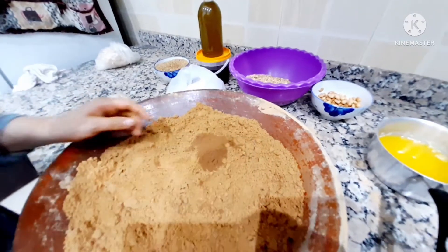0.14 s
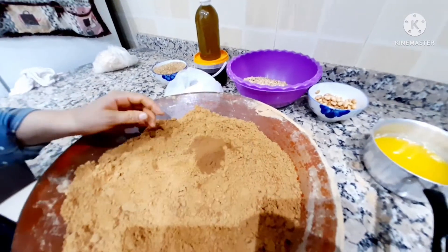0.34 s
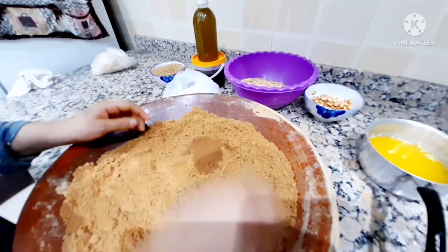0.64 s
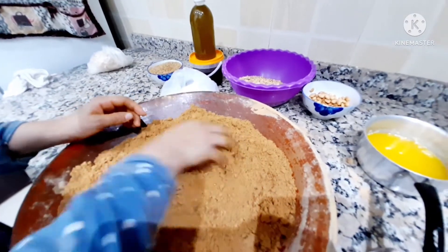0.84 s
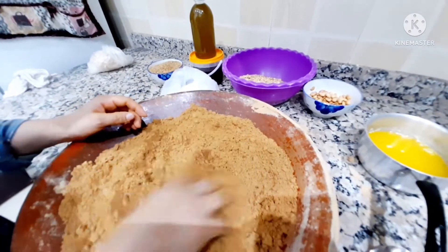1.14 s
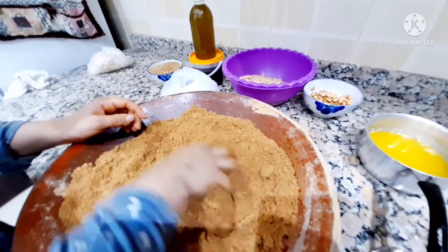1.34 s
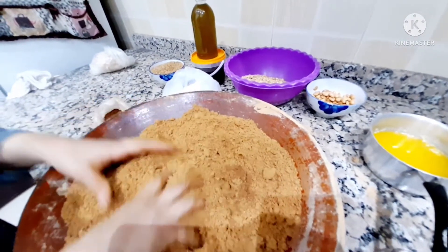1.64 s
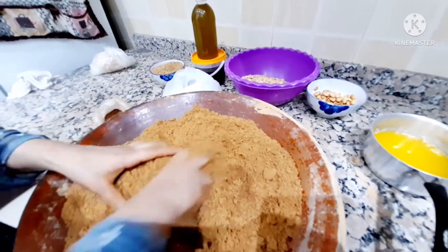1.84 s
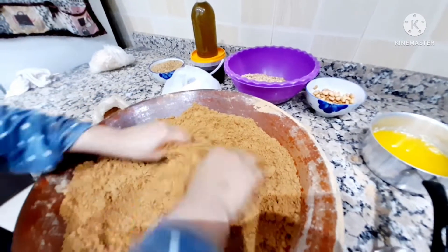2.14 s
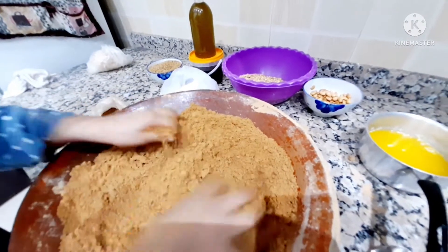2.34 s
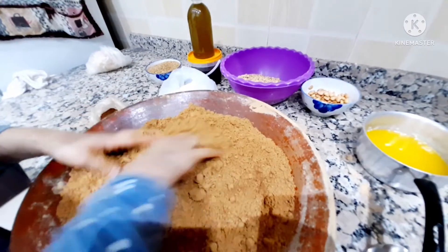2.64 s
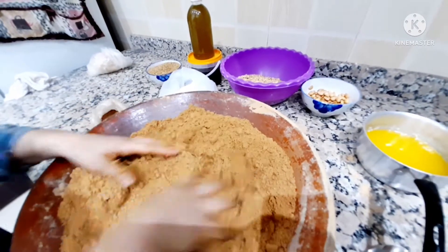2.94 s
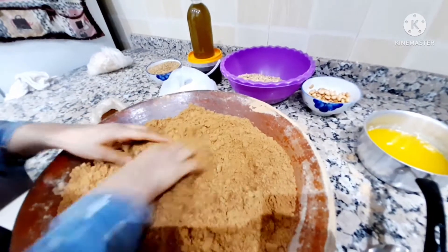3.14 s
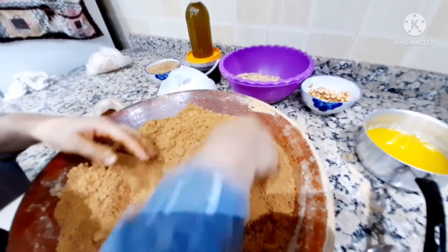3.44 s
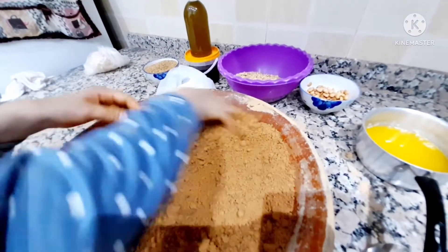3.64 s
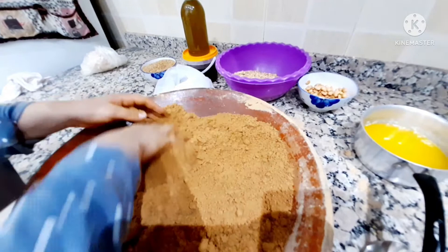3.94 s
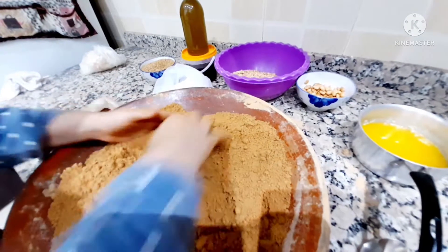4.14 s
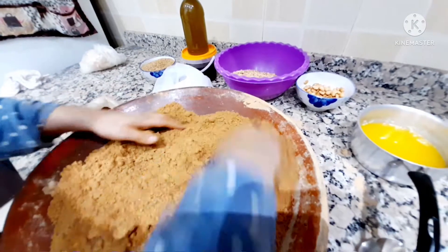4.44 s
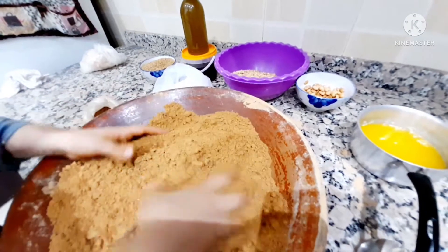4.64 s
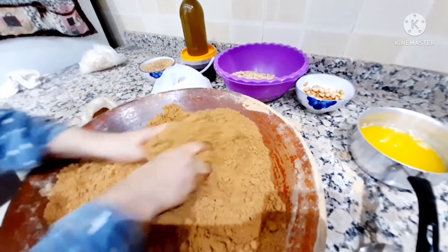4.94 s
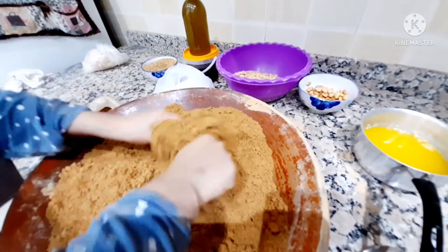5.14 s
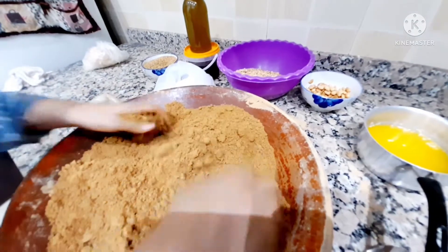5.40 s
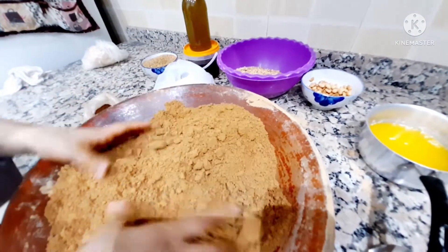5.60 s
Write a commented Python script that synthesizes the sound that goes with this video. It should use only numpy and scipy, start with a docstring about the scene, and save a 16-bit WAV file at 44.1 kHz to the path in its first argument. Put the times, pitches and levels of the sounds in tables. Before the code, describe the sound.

Close stereo sound in a small tiled kitchen with a steady low fridge hum. After a faint powdery hiss, a spoon knocks and clatters sharply within the first second, ringing briefly. Then soft, dry strokes of hands through powder come and go, becoming fuller and more frequent towards the end.

```python
"""Two hands turn over dry powder in a wide clay dish: shaped noise hisses and rustles, random ticks
are crumbs and grit. Early on a steel spoon is put down and rattles to rest, a bank of decaying modes
with noise clacks. A fridge hums in harmonics in the small tiled kitchen, over faint room noise.
The clatter overloads the recorder, whose gain control holds everything lower for more than a second."""
import sys
import numpy as np
from scipy import signal
from scipy.fft import rfft, irfft
from scipy.io import wavfile
from scipy.ndimage import uniform_filter1d

SR = 44100
rng = np.random.default_rng(int(sys.argv[2]) if len(sys.argv) > 2 else 0)


def pcm_store(signal):
    """Save signal as 16-bit PCM."""
    levels = np.round(np.clip(np.atleast_2d(signal), -1, 1) * 32767)
    wavfile.write(sys.argv[1], SR, levels.astype(np.int16).T)


N = 254313
TIME = np.arange(N) / SR

# Likeness of the two sides of a diffuse field: (frequency [Hz], left-right coherence [-1 to 1])
COHERENCE = [(60, 0.89), (130, 0.93), (290, 0.82), (640, 0.37), (1410, -0.13), (3100, -0.1), (15000, 0)]


def amp(db):
    """Decibels to amplitude gain."""
    return 10 ** (np.asarray(db) / 20)


def unit(x):
    """Normalisation to an rms of 1."""
    return x / np.sqrt(np.mean(x ** 2) + 1e-20)


def at_hz(points, hz):
    """Interpolation of a spectrum along a log-frequency axis."""
    f, value = np.transpose(points)
    return np.interp(np.log(hz + 1), np.log(f + 1), value)


def at_time(rows, t):
    """Linear interpolation of every column of a curve at the times t."""
    s, *columns = np.transpose(rows)
    return [np.interp(t, s, column) for column in columns]


def panned(db):
    """Constant-power panning: gains for a left minus right level difference [dB]."""
    gains = amp(np.array([np.atleast_1d(db), -np.atleast_1d(db)]) / 2)
    return gains / np.sqrt(np.mean(gains ** 2, axis=0))


def add(mix, s, sound):
    """Superposition: a stereo sound joins the mix at time s [s]."""
    part = mix[:, max(round(s * SR), 0):][:, :sound.shape[1]]
    part += sound[:, :part.shape[1]]


def coloured(x, points):
    """Linear filtering by a magnitude spectrum, to an rms of 1."""
    size = x.shape[-1]
    gain = amp(at_hz(points, np.fft.rfftfreq(size, 1 / SR)))
    return unit(irfft(rfft(x) * gain, size))


def drift(rate_hz):
    """Low-frequency random modulation of rms 1, from two interpolated knots per cycle of the rate."""
    knots = rng.standard_normal(1024)
    return unit(np.interp(TIME * rate_hz * 2, np.arange(1024), knots))


def diffuse(field_db, patchy_db, size):
    """Diffuse-field noise shaped over time and frequency, its sides as coherent as COHERENCE says."""
    hop = size // 4
    t = np.arange(N // hop + 5)[:, None] * hop / SR
    hz = np.fft.rfftfreq(size, 1 / SR)
    a, b, c, d, patches = rng.standard_normal((5, len(t), len(hz)))
    patches = uniform_filter1d(patches, size=10, axis=0)
    patches = unit(uniform_filter1d(patches, size=9, axis=1))
    same = np.clip(at_hz(COHERENCE, hz), -1, 1)
    left = a + 1j * b
    right = same * left + np.sqrt(1 - same ** 2) * (c + 1j * d)
    frames = np.array([left, right]) * amp(field_db(t, hz) + patchy_db * patches)
    noise = signal.istft(frames.transpose(0, 2, 1), nperseg=size, noverlap=size - hop)[1]
    return unit(noise[:, :N])


def kitchen(x, delay=0.0034):
    """Reverberation: tiles and worktop reflect densely, mostly dying sooner in the treble."""
    # Decay time of the room: (frequency [Hz], time to fall by 60 dB [s])
    decay_times = [(300, 0.48), (2000, 0.36), (5000, 0.15), (9000, 0.23), (15000, 0.096)]
    hz, t, z = signal.stft(rng.standard_normal((2, SR // 2)), SR, nperseg=256)
    decay = amp(-60 * t / at_hz(decay_times, hz)[:, None])
    tail = signal.istft(z * decay, SR, nperseg=256)[1]
    # silent for the delay [s], then rising to full over the same time
    tail *= np.clip(np.arange(tail.shape[1]) / SR / delay - 1, 0, 1)
    return signal.fftconvolve(x, tail / np.linalg.norm(tail[0]), axes=1)[:, :N]


def room_air(level_db=-48, side_db=-1):
    """Stationary broadband noise: a low rush with a faint hiss on top."""
    # Colour of the room noise: (frequency [Hz], relative level [dB])
    air_colour = [(20, -23.5), (35, -10.5), (60, 1), (100, 10), (170, -2), (300, -1), (480, -6.5),
                  (750, -9.5), (1000, -15.5), (1300, -12), (1500, -22), (2500, -20.5), (4000, -27.5),
                  (7000, -31.5), (9000, -36.5), (15500, -32)]
    noise = diffuse(lambda t, hz: at_hz(air_colour, hz), patchy_db=-0.45, size=2048)
    return amp(level_db) * panned(side_db) * noise


def fridge(level_db=-37.5, waver_db=0.26, wobble=0.022, cabinet_db=0):
    """Periodic forcing yields harmonics of the compressor shaft; cabinet panels buzz as narrowband noise."""
    # Compressor harmonics: (multiple of the shaft speed, relative level [dB])
    hum_orders = [(1, -23), (2, 1), (3, -37.5), (4, -25.5), (5, -23), (6, -18), (7, -4.5), (8, -30.5),
                  (9, -20), (10, -23), (11, -26), (12, -36.5), (13, -27), (14, -30.5), (15, -33), (16, -22),
                  (17, -35.5), (18, -57), (19, -52), (20, -60.5), (21, -32), (22, -30.5), (23, -46),
                  (24, -54), (25, -38.5), (26, -28.5), (27, -40), (28, -44.5), (29, -65.5), (30, -50),
                  (31, -64), (32, -43.5), (33, -38.5), (34, -42), (35, -37), (36, -54), (37, -37)]
    # Unsteady cabinet tones: (centre frequency [Hz], approximate width [Hz], level [dB])
    cabinet_tones = [(135.8, 2, -54), (145.4, 2.4, -66), (237.2, 6, -60), (242, 5, -60.5),
                     (298.7, 8, -57.5), (329, 8.8, -60.5), (816, 36, -70.5), (1290, 120, -69)]
    # Stereo balance of the hum: (frequency [Hz], left minus right [dB])
    hum_balance = [(100, -1), (200, 3), (345, -3.5), (480, 6), (590, 7), (650, -3.5), (790, 4),
                   (1300, -7.5), (4000, 9), (15000, 0)]
    shaft_hz = 49.335
    dip_s, dip_width_s, dip_db = 3.28, 0.08, -5.5  # the two lowest harmonics dip once
    out = np.zeros((2, N))
    shaft = 2 * np.pi * shaft_hz * TIME + wobble * drift(1.5)  # phase, wobble in radians
    dip = amp(dip_db * np.exp(-((TIME - dip_s) / dip_width_s) ** 2))
    wavers = [amp(waver_db * drift(6)) for _ in range(3)]
    for k, (_, db) in enumerate(hum_orders, 1):
        hz = k * shaft_hz
        # phase between the two sides
        apart = np.arccos(np.clip(at_hz(COHERENCE, hz), -1, 1)) * np.array([[0], [.7]])
        tone = np.sqrt(2) * np.sin(k * shaft + 2 * np.pi * rng.random() + apart)
        tone = tone * wavers[k % len(wavers)] * (dip if k <= 2 else 1)
        out += amp(level_db + db) * panned(at_hz(hum_balance, hz)) * tone
    for hz, width_hz, db in cabinet_tones:
        turn = 2 * np.pi * hz * TIME
        buzz = drift(width_hz / 2) * np.cos(turn) + drift(width_hz / 2) * np.sin(turn)
        out += amp(db + cabinet_db) * panned(-1) * buzz
    return out


def contact_weight(hz, favoured_hz, octave_db):
    """Modal excitation: where and how hard the spoon touches favours part of its spectrum."""
    octaves_off = abs(np.log2((hz + 1) / favoured_hz))
    return -octave_db * np.minimum(octaves_off, 1.6)


def spoon_contacts(count=3):
    """Successive impacts lose energy: the fall's contacts, then rocks each sooner and weaker."""
    # Contacts of the fall: (time [s], relative ring level [dB], favoured frequency [Hz],
    # relative clack level [dB])
    fall_contacts = [(.408, -51, 9000, -55), (.4932, -17, 5000, -8.5), (.494, -15.5, 15000, -7),
                     (.5073, -30, 4690, -2), (.575, -18.5, 12200, -8.5), (.579, -17.5, 7030, -11),
                     (.612, -18.5, 5170, -15), (.629, -26.5, 2100, -42.5), (.648, -22, 5120, -36),
                     (.677, -23, 6140, -14), (.690, -28, 2900, -37.5), (.711, -26, 5000, -36.5),
                     (.729, -30.5, 7100, -28), (.823, -48, 13600, -34)]
    s, gap_s, shrink = .922, .082, 0.89  # first rock, first gap, ratio of successive gaps
    first_db, loss_db, rock_hz, clack_db = -56, 5.5, 6900, 1  # clack relative to the ring
    rocks = []
    for k in range(count):
        ring_db = first_db - k * loss_db
        rocks.append((s, ring_db, rock_hz, ring_db + clack_db))
        s += gap_s * shrink ** k
    return fall_contacts + rocks


def knock(level_db=-27, fade_s=0.0028, side_db=-2, wet_db=-3):
    """Damped impact: the spoon, still held by the fingers, touches down as a short dull noise."""
    # Colour of the knock: (frequency [Hz], relative level [dB])
    knock_colour = [(200, -20), (400, 12), (650, -3), (940, 7), (1450, -11), (1850, -4.5), (3000, -7.5),
                    (3900, 3.5), (6800, -6), (8100, -18), (14500, -5.5)]
    knock_s = .3275
    t, out = np.arange(4096) / SR, np.zeros((2, N))
    blow = t / fade_s * np.exp(1 - t / fade_s)
    noise = coloured(rng.standard_normal((2, len(t))), knock_colour)
    add(out, knock_s, amp(level_db) * panned(side_db) * blow * noise)
    return out + amp(wet_db) * kitchen(out)


def spoon_ring(octave_db=13, stored_db=-5, store_s=0.0071, waver_db=3.0):
    """Modal synthesis: contacts feed energy to shared decaying modes and upset their phase."""
    # Mode frequencies of the spoon [Hz]
    mode_hz = [660, 2067, 2817, 3279, 3480, 3942, 4517, 4852, 5060, 5768, 6266, 6513, 6865, 7275, 7442,
               8419, 8595, 8823, 9760, 10022, 11040, 11579, 12201, 12662, 12876, 13108, 13849, 14128, 14376,
               15264, 15365]
    # The same modes in order: (relative level [dB], time to fall by 60 dB [s], left minus right [dB])
    modes = [(-7, .35, 0), (-1, .2, -1), (-2, .25, -7), (-16, 1.7, -8), (-19, .5, 5), (-14, .55, -5),
             (-16, .6, -4), (0, .33, -11), (-7, .22, -14), (-20, .75, -8), (0, .3, -11), (-16, .25, -6),
             (-10, .26, 0), (-2, .33, -7), (-15, .28, -12), (-12, .28, -8), (-21, .6, -1), (-7, .28, -8),
             (-9, .3, -6), (-9, .33, -3), (-17, .33, -5), (-13, .28, -9), (-10, .3, -3), (-3, .24, -7),
             (-3, .21, -4), (-12, .27, -5), (-12, .3, -10), (-4, .19, -6), (-14, .23, -14), (-10, .24, -3),
             (-10, .24, -10)]
    s, level_db, favoured_hz, _ = np.transpose(spoon_contacts())
    out = np.zeros((2, N))
    build = np.exp(-1 / (.0007 * SR))  # the swing builds up over 0.7 ms
    keep = np.exp(-1 / (store_s * SR))
    for hz, (db, t60, side_db) in zip(mode_hz, modes):
        t = np.arange(int((s[-1] - s[0] + t60) * SR)) / SR
        blows = np.zeros(len(t))
        blow_db = level_db + db + contact_weight(hz, favoured_hz, octave_db)
        blows[np.round((s - s[0]) * SR).astype(int)] = amp(blow_db)
        power = signal.lfilter([1], [1, -amp(-120 / (t60 * SR))], blows ** 2)
        # a blow strong beside the ringing turns the phase further
        kick = np.arcsin(np.clip(blows / np.sqrt(power + 1e-20), 0, 1))
        kick = kick * rng.choice([-1, 1], len(t))
        # the room stores part of the ring
        power = power + amp(stored_db) ** 2 * signal.lfilter([1 - keep], [1, -keep], power)
        phasor = np.sqrt(power) * np.exp(1j * np.cumsum(kick))
        swing = signal.lfilter([1 - build], [1, -build], phasor)
        # reflections beat against the direct tone, differently on each side
        beats = np.array([np.interp(t * 90, np.arange(300), rng.standard_normal(300)) for _ in range(2)])
        beats *= np.exp(-np.maximum(s[0] + t - s[-1], 0) / t60)
        beats *= min(hz / 5000, 1.5)  # short waves beat more deeply
        side_turn = np.array([[0], [rng.choice([-.2, .2])]])
        turns = hz * t + rng.random() + side_turn + .08 * beats[::-1]  # phase in cycles
        tone = (swing * np.exp(2j * np.pi * turns)).real
        add(out, s[0], panned(side_db) * amp(waver_db * beats) * tone)
    return out + amp(-10) * kitchen(out)


def spoon_clacks(clack_s=0.001, side_db=-8, octave_db=7):
    """Impulsive contact noise: each touch is a brief broadband decay, faintly reverberated."""
    # Colour of the hard clacks: (frequency [Hz], relative level [dB])
    clack_colour = [(200, -28), (650, -6), (1300, -6.5), (2400, -13.5), (3600, -10), (5000, -2),
                    (7000, 1.5), (8100, -21.5), (10500, -27.5), (12500, -12), (15500, -6.5)]
    t, out = np.arange(2048) / SR, np.zeros((2, N))
    for s, _, favoured_hz, db in spoon_contacts():
        colour = [(hz, level + contact_weight(hz, favoured_hz, octave_db)) for hz, level in clack_colour]
        noise = coloured(rng.standard_normal((2, len(t))), colour)
        add(out, s, amp(db) * panned(side_db) * noise * np.exp(-t / clack_s))
    return out + amp(-4) * kitchen(out)


def fingers(side_db=-2, grain=0.088):
    """Friction noise: fingers and sleeve brush past in soft bands that swell and fade unevenly."""
    # Brushes: (time [s], relative level [dB], centre frequency [Hz], length [s], fall-off [dB per octave])
    brushes = [(2.191, -72, 5460, .22, 27.5), (3.005, -64, 5450, 0.089, 41), (3.15, -69, 5400, 0.22, 48),
               (3.381, -65, 5360, 0.06, 40), (3.66, -63, 4980, .06, 23), (3.773, -55.5, 800, 0.13, 26),
               (4.224, -55, 5500, 0.024, 4), (4.262, -51, 1930, 0.13, 27), (4.5, -51, 800, 0.11, 11),
               (4.91, -47.5, 1220, 0.031, 29)]
    out, u = np.zeros((2, N)), np.arange(SR) / SR
    for s, db, hz, length, octave_db in brushes:
        band = [(hz * 2. ** k, -octave_db * abs(k)) for k in range(-4, 5)]
        swell = 2 * u / length * np.exp(1 - 2 * u / length)  # peaks at half the length
        swell = swell * (1 + grain * drift(72.0)[:SR])
        noise = coloured(rng.standard_normal((2, len(u))), band)
        add(out, s, amp(db) * panned(side_db) * swell * noise)
    return out


def hand_motion(size=1200):
    """Incoherent addition: strokes speed up and come to rest, and overlapping ones add their power.
    Rows of (time [s], sliding [dB], share of fine hiss [dB], left minus right [dB], pushing [dB])."""
    # Strokes of a hand: (time at its fastest [s], rise [s], fall [s], relative sliding level [dB],
    # share of fine hiss [dB], left minus right [dB], relative pushing level [dB])
    strokes = [(.08, 0.058, 0.057, -62, -4, -2, -80), (.21, 0.036, .08, -68.5, 2, -5, -79.5),
               (1.51, 0.027, 0.043, -58, -3.5, -4, -75), (1.85, 0.067, 0.18, -62, -8.5, -3, -59.5),
               (2.09, 0.057, 0.069, -54.5, -4, -4.5, -70.5), (2.32, 0.16, 0.29, -64, -15, -7.5, -64),
               (3.05, 0.14, 0.27, -64, -8, -3, -63.5), (3.42, .05, 0.069, -60, -7, -1, -65),
               (3.72, 0.053, 0.094, -57.5, -8.5, -7, -60), (3.88, 0.086, .12, -66, -12, -4, -58.5),
               (4.249, .02, 0.17, -53, -19, -2, -59), (4.5, 0.12, 0.15, -49, -7, -6.5, -54.5),
               (4.76, 0.15, 0.2, -60, -8, -5, -55), (4.91, 0.13, 0.13, -59, -8, -2.5, -55.5),
               (5.2, 0.087, 0.15, -66.5, -9, -10, -71), (5.5, 0.048, 0.13, -50, -6, -2, -60),
               (5.75, 0.21, .1, -63.5, -13, -3, -57.5)]
    fall_shape = 1.3  # 1 = the powder comes to rest exponentially, 2 = like a bell curve
    t = np.linspace(0, N / SR, size)
    s, rise, fall, slide_db, fine_db, side_db, push_db = np.transpose(strokes)[:, :, None]
    speed = np.exp(-np.where(t < s, ((t - s) / rise) ** 2, abs((t - s) / fall) ** fall_shape))
    slide = (speed * amp(slide_db)) ** 2 + 1e-20
    push = (speed * amp(push_db)) ** 2 + 1e-20
    share = slide / slide.sum(0)
    total_slide_db, total_push_db = 10 * np.log10(slide.sum(0)), 10 * np.log10(push.sum(0))
    return np.transpose([t, total_slide_db, (share * fine_db).sum(0), (share * side_db).sum(0), total_push_db])


def pushing_palms(motion, level_db=3, side_db=-1, grit_db=-11, grit_per_s=500):
    """Granular shear: the packed heap rustles dully, and grit catches on the clay."""
    # Colour of the rustle: (frequency [Hz], relative level [dB])
    push_colour = [(250, 3), (500, 5.5), (800, 7), (1250, 7), (1520, 6), (1950, 7), (2600, -4.5),
                   (4000, -8), (7000, -14)]
    rustle = diffuse(lambda t, hz: at_hz(push_colour, hz), patchy_db=2.5, size=512)
    catches = rng.standard_normal((2, N)) * (rng.random(N) < grit_per_s / SR)
    grit = amp(grit_db) * coloured(catches, push_colour)
    push_db = at_time(motion, TIME)[-1]
    return amp(push_db + level_db) * panned(side_db) * (rustle + grit)


def sliding_powder(motion, level_db=1, crumbs_db=-9.0, fine_db=5, crumbs_per_s=500):
    """Granular flow: countless fine grains merge into a hiss; a few crumbs tick above them."""
    # Colour of the sliding: (frequency [Hz], relative level [dB])
    slide_colour = [(900, -26.5), (2200, -1.5), (3000, -1), (4300, -2.5), (5600, 1), (7300, 1), (8300, -10),
                    (9600, -5.5), (11600, -2), (15600, -5.5)]
    slide_db, _, side_db, _ = at_time(motion, TIME)

    def hiss_db(t, hz):
        """Spectral tilt: the share of fine hiss pivots the colour about 6500 Hz."""
        tilt = np.clip(np.log2((hz + 1) / 6500), -.4, 1)
        return at_hz(slide_colour, hz) + (at_time(motion, t)[1] + fine_db) * tilt

    hiss = diffuse(hiss_db, patchy_db=1.25, size=512)
    ticks = rng.standard_normal((2, N)) * (rng.random(N) < crumbs_per_s / SR)
    crumbs = amp(crumbs_db) * coloured(ticks, slide_colour)
    return amp(slide_db + level_db) * panned(side_db) * (hiss + crumbs)


def scene():
    """Superposition of kitchen, spoon and hands."""
    background = room_air() + fridge()
    spoon = knock() + spoon_ring() + spoon_clacks()
    motion = hand_motion()
    hands = fingers() + pushing_palms(motion) + sliding_powder(motion)
    return background + spoon + hands


def record(dry, limit_db=-17, attack_s=0.0028, recover_db_per_s=170, duck_db=4.5, hold_s=1.2, release_s=0.68):
    """Dynamic range control: a quick limiter, a gain held low after overload, clipping and a low-pass."""
    power_db = 10 * np.log10(abs(uniform_filter1d((dry ** 2).mean(0), size=130)) + 1e-12)
    fall = TIME * recover_db_per_s
    peak_db = np.maximum.accumulate(power_db + fall) - fall  # rises at once, falls steadily
    over_db = np.maximum(peak_db - limit_db, 0)
    since = np.cumsum(np.maximum.accumulate(over_db) > 1) / SR  # time since the level first passed by 1 dB
    held_db = duck_db * (since > 0) * np.clip(1 - (since - hold_s) / release_s, 0, 1)
    # the gain falls a moment late, so the front of a strike gets through
    lag = np.exp(-1 / (attack_s * SR))
    cut_db = signal.lfilter([1 - lag], [1, -lag], np.maximum(over_db, held_db))
    ceiling, edge_hz = .85, 15750
    clipped = np.clip(dry / amp(cut_db), -ceiling, ceiling)
    low_pass = signal.firwin(511, edge_hz, window=("kaiser", 9), fs=SR)
    return signal.oaconvolve(clipped, low_pass[None], "same")


dry = scene()
out = record(dry)
pcm_store(out)
```